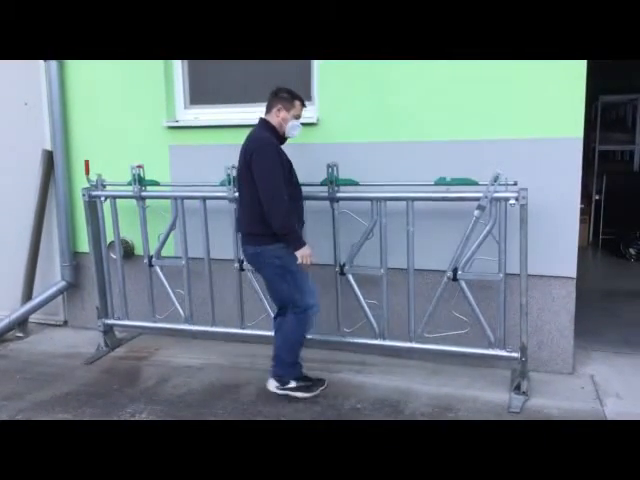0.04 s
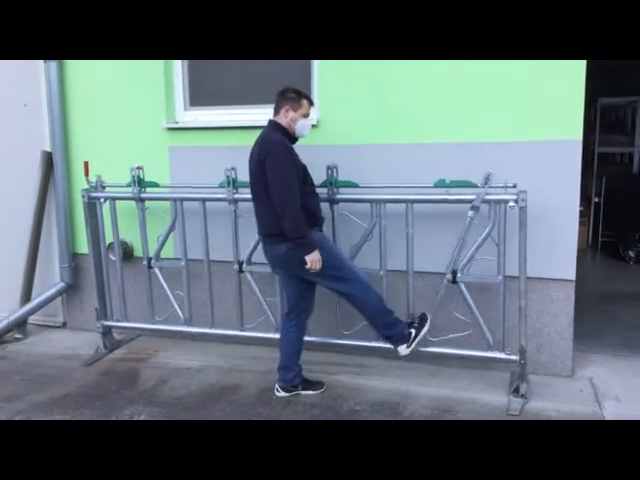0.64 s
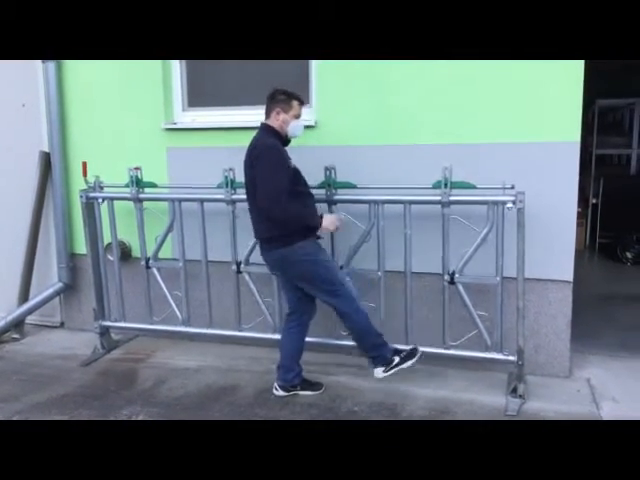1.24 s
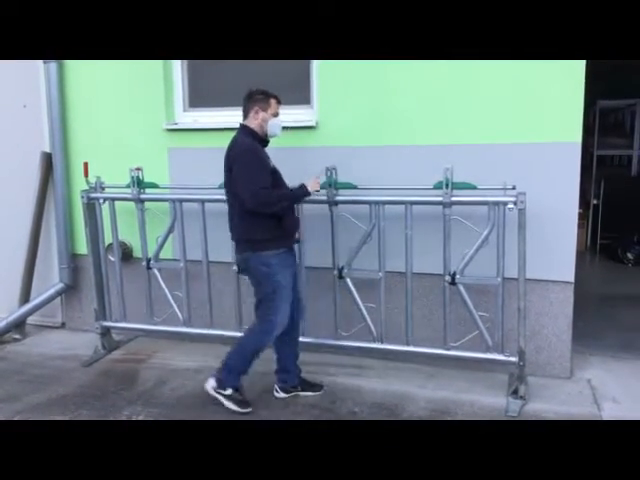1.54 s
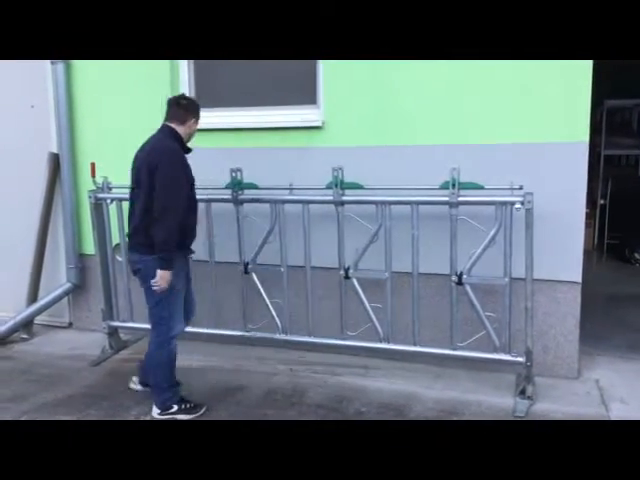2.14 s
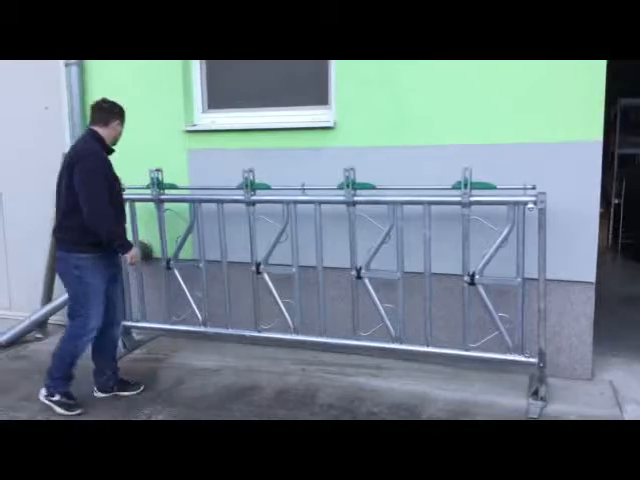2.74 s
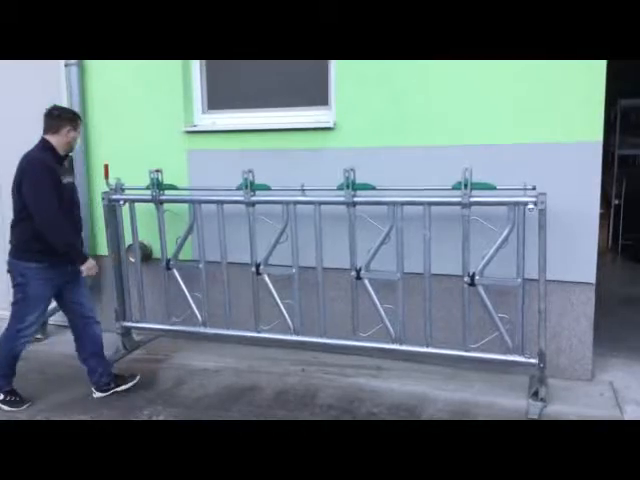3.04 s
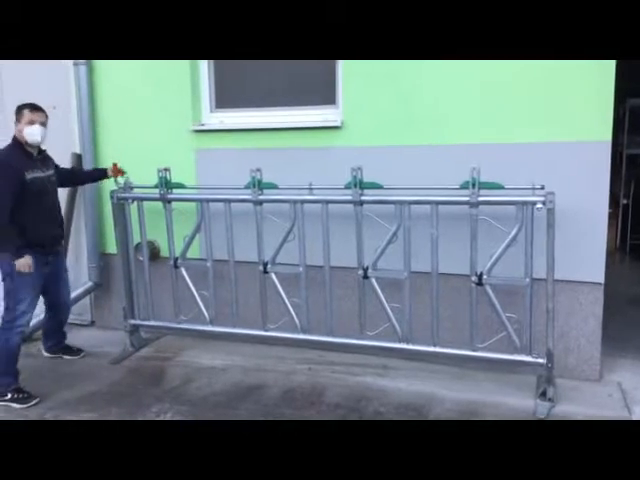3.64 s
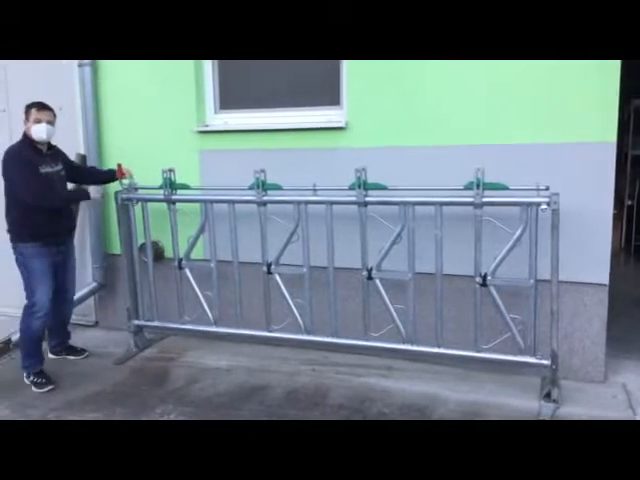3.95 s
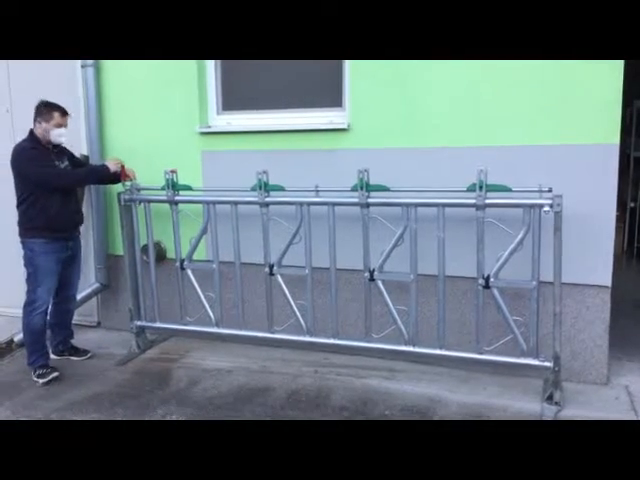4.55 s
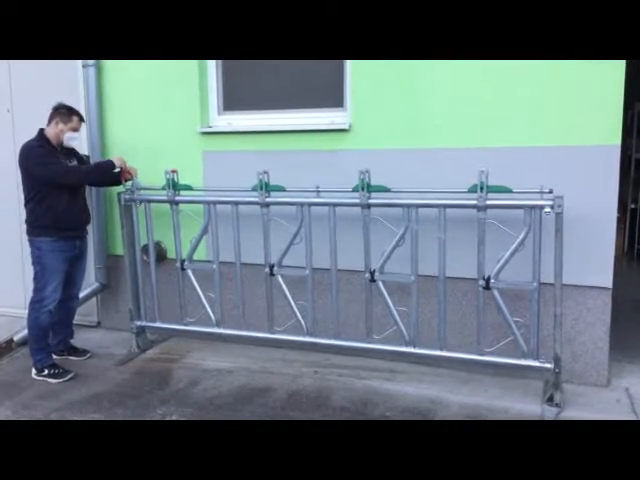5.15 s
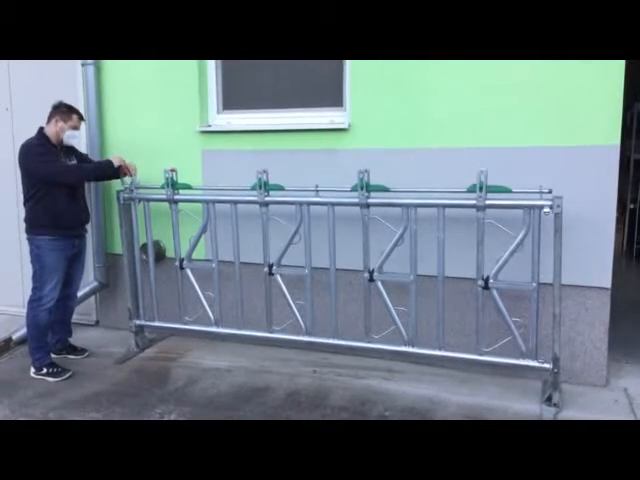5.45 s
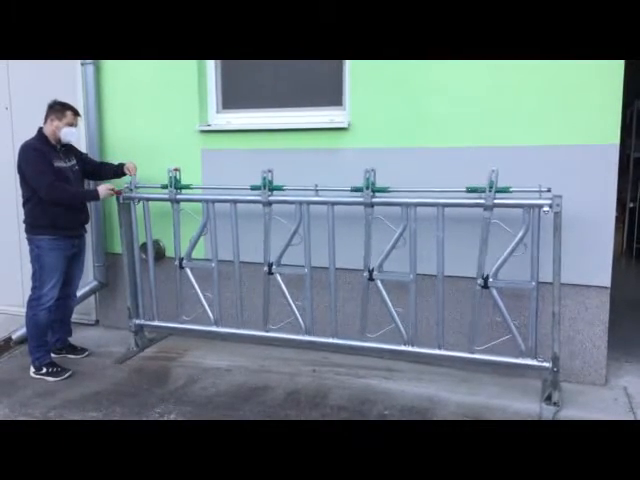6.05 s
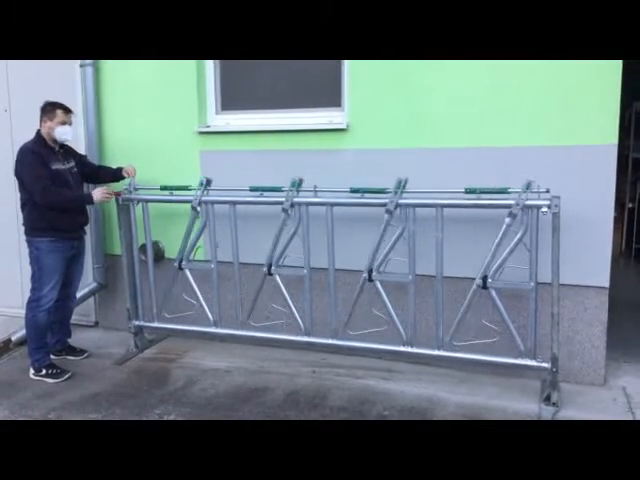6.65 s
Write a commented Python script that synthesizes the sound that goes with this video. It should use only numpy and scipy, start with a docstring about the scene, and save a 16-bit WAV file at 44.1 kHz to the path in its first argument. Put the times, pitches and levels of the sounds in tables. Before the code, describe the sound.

Distant road noise and a low engine drone run throughout in an outdoor concrete yard, the road noise slowly easing. A soft gritty footstep comes at the very start. Around 0.8 seconds a steel barrier rattles, then a bar clanks loudly into its catch at 1 second, with a smaller rebound at 1.3 and a short ring from the tubes. Four quiet steps crunch on sandy concrete between 1.8 and 3.9 seconds, and a thin far whine swells briefly near 2. At about 4 seconds a sole squeaks and scuffs, followed by light shuffles. A lever snaps over with a sharp, ringing clank at 5 seconds. From 5.9 the frame rattles and knocks, and near 6.5 several bars fall in a loud clatter, bouncing and dying away. The walls add a short echo. Very faint bird chirps dot the middle, and a far exhaust hum rises slightly toward the end.

```python
"""A gritty footstep over a distant road hush, then a foot pushes one swinging bar of a galvanized feed
barrier until it clanks into its catch. Steps crunch to the end, a sole squeaks, a lever snaps over, and
the locking rod turns and lets all the bars fall open in a clatter. Each blow cracks, shakes the frame's
short modes and leaves the tubes ringing. The concrete yard's walls answer; far off, small birds call,
engines drone and the road noise recedes."""
import sys
import numpy as np
from scipy import signal
from scipy.fft import rfft, irfft, next_fast_len
from scipy.io import wavfile
from scipy.ndimage import map_coordinates

SR = 44100
rng = np.random.default_rng(int(sys.argv[2]) if len(sys.argv) > 2 else 0)


def wav_record(signal):
    """Record a signal, one row per channel, as 16-bit PCM in the file named by sys.argv[1]."""
    frames = np.transpose(np.atleast_2d(signal))
    bounded = np.clip(frames, -1, 1)
    # unit amplitude maps onto the largest positive 16-bit level
    quanta = np.round(bounded * 32767).astype(np.int16)
    wavfile.write(sys.argv[1], SR, quanta)


N = 299880
TOP_HZ = 10480  # top of the frame's modes and of the mix

# single hard knocks (the faint one at 4.104 s adds bite to a shoe's stamp):
# t/s, level/dB, tilt/(dB/octave), chatter/s, tube ring/dB, place (0 = far bar, 1 = lever end)
KNOCKS = [(.852, -31, -4, 0.0044, -1.5, .85), (1.044, -18.5, 0, .006, -1, 0),
          (1.268, -31, -2.5, 0.015, -3, 0), (1.286, -31, -7, 0.013, -8, 0.15),
          (4.104, -44.5, -3.5, 0.0042, -13.5, 0.91), (5.049, -20, .5, 0.0043, -2.5, .82),
          (5.675, -46.5, -10.5, 0.023, -19, .8), (6.097, -25.5, -4.5, .009, 0, 0.54),
          (6.438, -38.5, 8, .006, -8, .6)]
def barrier(ring_trim_db=-3):
    """The main hits: every knock, rattle and bounce clanks the frame and rings the tubes."""
    out = np.zeros(N)
    mode_sets = [frame_modes() for _ in range(4)]  # each hit picks one at random, varying its colour
    for s, db, tilt, chatter_s, ring_db, place in KNOCKS + rattles() + bounces():
        modes = mode_sets[rng.integers(len(mode_sets))]
        add(out, s, amp(db) * frame_clank(modes, tilt, chatter_s))
        add(out, s, amp(db + ring_db + ring_trim_db) * tube_ring(place, tilt, chatter_s))
    return out


# a foot or the rod pushes the frame: t/s, length/s, first level/dB, last level/dB, tilt/(dB/octave)
RATTLES = [(.792, .15, -35, -41, -1.5), (5.942, .15, -41.5, -31.5, -4), (6.282, .135, -36, -30.5, -1.5)]
def rattles(count=4, scatter=0.25, dulling=2.2, chatter_s=0.028, ring_db=3.5, place=0.53):
    """Each push jogs loose parts at uneven gaps, duller after the first contact; rows as in KNOCKS."""
    progress, rows = np.linspace(0, 1, count), []
    for s, length, first_db, last_db, tilt in RATTLES:
        jitter = (progress > 0) * scatter * rng.uniform(-1, 1, count)
        times = s + length * (np.arange(count) + jitter) / count
        for at, u in zip(times, progress):
            db = first_db + u * (last_db - first_db)
            rows.append((at, db, tilt - dulling * (u > 0), chatter_s, ring_db, place))
    return rows


# four bars hit their stops: t/s, level/dB, tilt/(dB/octave), place, first flight/s, first loss/dB
FALLS = [(6.452, -17, -0.5, 0.6, 0.097, 3), (6.469, -18.5, -2.5, 0.5, 0.1, -0.5),
         (6.482, -23.5, 5.5, 0.5, .103, -1.5), (6.498, -19.5, 1, .5, 0.13, 6)]
def bounces(count=4, flight_ratio=0.96, later_loss_db=7):
    """Each falling bar rebounds ever sooner and looser as it dies away; rows as in KNOCKS."""
    rows = []
    for s, first_db, tilt, place, flight_s, first_loss_db in FALLS:
        for k in range(count):
            at = s + flight_s * np.sum(flight_ratio ** np.arange(k))
            db = first_db - first_loss_db * (k > 0) - later_loss_db * max(k - 1, 0)
            chatter_s, ring_db = 0.008 + 0.003 * k, -8 + 3 * k
            rows.append((at, db, tilt, chatter_s, ring_db, place))
    return rows


# tone colour of the steel frame: f/Hz, relative level/dB
FRAME_COLOUR = [(200, -9), (260, -16), (330, -20), (480, -24), (640, -17), (820, -12), (1500, -4.5),
                (2400, 0), (3100, -4.5), (3600, -7), (4500, -11), (6500, -18.5), (9000, -23.5),
                (10500, -30)]
# decay of its modes: f/Hz, t60/s
FRAME_DECAY = [(300, 0.18), (1500, 0.16), (3000, 0.13), (6000, 0.12), (10000, 0.11)]
def frame_modes(count=520):
    """The frame's crowd of short modes: frequencies, strengths and one decaying wave each."""
    position = (np.arange(count) + rng.random(count)) / count
    hz = 200 * (TOP_HZ / 200) ** (position ** (2 / 3))
    # the upper modes differ widely in strength and life; the low ones blur into a thud
    uneven = np.clip(hz / 2500, 0, 1)
    t60 = along(FRAME_DECAY, hz) * np.exp(0.3 * uneven * rng.standard_normal(count))
    strength_db = along(FRAME_COLOUR, hz) + uneven * rng.uniform(-9, 5, count)
    t = np.arange(SR * 2 // 5, dtype=np.float32) / SR
    phases = rng.uniform(0, 2 * np.pi, count)
    omega, damping, phase = np.float32([2 * np.pi * hz, np.log(1000) / t60, phases])[:, :, None]
    waves = np.sin(omega * t + phase) * np.exp(-damping * t)
    return hz, amp(strength_db) * np.sqrt(np.gradient(hz)), waves


def frame_clank(modes, tilt, chatter_s, crack_db=-3, crack_t60=0.014, attack_s=0.0011):
    """Body and bite of a hit: every rebound tops up the dying modes and adds a noisy crack."""
    hz, strength, waves = modes
    n = waves.shape[1]
    t = np.arange(n) / SR
    blows = np.pad(chatter(chatter_s), (0, n))[:n]
    colour = strength * amp(tilt * octaves(hz, 2300))
    body = np.float32(colour / np.linalg.norm(colour) * rng.choice([-1, 1], len(hz))) @ waves
    decay_makeup = amp(60 * np.minimum(t, 3 * chatter_s) / along(FRAME_DECAY, 2300))
    top_up = np.sqrt(np.cumsum((blows * decay_makeup) ** 2))
    crack_energy = abs(signal.fftconvolve(blows ** 2, amp(-60 * t / crack_t60) ** 2)[:n])
    hiss = filtered(rng.standard_normal(n),
                    lambda f: amp(along(FRAME_COLOUR, f) + tilt * octaves(f, 2300)))
    cracks = amp(crack_db) * unit(hiss) * np.sqrt(crack_energy)
    return (np.sqrt(2) * body * top_up + cracks) * (1 - np.exp(-t / attack_s))


def chatter(length, count=16, firm_s=0.015):
    """A first contact and the weakening rebounds of loose parts, energy 1; long chatter starts softly."""
    length = length + 1e-4
    when = np.append(0, np.sort(rng.uniform(0, 3, count)))  # in multiples of the length
    rebounds = rng.choice([-1, 1], count) * rng.uniform(0.25, 0.84, count)
    size = np.append(min(firm_s / length, 1.2), rebounds) * np.exp(-0.6 * when)
    return np.bincount((when * length * SR).astype(int), size / np.linalg.norm(size))


# the tubes' clear modes: f/Hz, t60/s, level/dB struck at the far bar, level/dB struck at the lever end
TUBE_MODES = [(841, 0.2, -16, -16.5), (933, 0.12, -16.5, -27), (1208, 0.68, -21.5, -23),
              (1280, .4, -16.5, -18), (1517, 0.55, -11, -17.5), (1522, 0.73, -19.5, -7.5),
              (1550, 0.5, -19, -7.5), (1583, 0.53, -15, -17), (1667, 0.45, -12.5, -17),
              (1880, 0.54, -25, -25.5), (1980, 0.24, -23.5, -17), (1990, 0.37, -19.5, -27.5),
              (2267, .55, -21.5, -19), (2420, .2, -12, -20), (2670, .25, -19.5, -24.5),
              (2794, 0.77, -32, -21.5), (2860, 0.31, -4.5, -22), (2995, 0.8, -15, -35),
              (3060, 0.19, -5.5, -21), (3340, .35, -27.5, -16.5), (3427, 1.1, -39.5, -23),
              (3580, 1.36, -20.5, -51.5), (3727, 0.8, -21.5, -34), (4107, 0.8, -43.5, -28.5),
              (4320, 0.68, -35, -25.5), (6130, .08, -9, -32), (6395, .33, -42.5, -34),
              (6860, .14, -19.5, -36.5), (9060, 0.18, -29.5, -23), (10140, .2, -33, -24)]
def tube_ring(place, tilt, chatter_s, mistune_per_s=0.334):
    """The pitched tail of a hit: the place of the blow decides which tubes speak."""
    t = np.arange(SR) / SR
    hz, t60, bar_db, lever_db = np.transpose(TUBE_MODES)
    mode_db = bar_db + place * (lever_db - bar_db) + tilt * octaves(hz, 2300)
    gains = np.float32(amp(mode_db + rng.standard_normal(len(hz))))
    # long chatter spreads to neighbouring bars of slightly different pitch
    detune = mistune_per_s * max(chatter_s - 0.012, 0)
    pitch = hz * (1 + detune * rng.standard_normal(len(hz)))
    cycles = np.float32(pitch[:, None] * t + rng.random((len(hz), 1)))
    decay = np.float32(amp(-60 * t / t60[:, None]))
    attack = 1 - np.exp(-t / (0.0016 + chatter_s / 2))
    return gains @ (decay * np.sin(2 * np.pi * cycles)) * attack


# modes of the lever and its stop: f/Hz, t60/s, relative level/dB
LEVER_MODES = [(832.3, 0.31, -21), (1860, 0.12, -1), (2107, .15, -9.5), (2420, .085, -1.5),
               (2510, 0.085, -10.5), (2840, .13, -9.5), (3060, 0.063, -2), (3360, .14, -12.5),
               (3840, 0.1, -14), (4300, .15, -17), (4650, .13, -20), (5330, 0.092, -20.5),
               (6850, .14, -24.5), (8760, .16, -26.5), (8930, .14, -25), (9800, .18, -33.5)]
# modes of the swinging bar's small catch: f/Hz, t60/s, relative level/dB
CATCH_MODES = [(5280, .04, 0), (5450, .05, 5), (5760, .04, 0), (7350, 0.027, -11), (9530, 0.029, -13)]
# jogs of the catch: t/s, level/dB
TINKS = [(0.688, -58.5), (.712, -64), (.798, -49)]
def catch_and_lever(snap_s=5.0495, snap_db=-16):
    """The catch tinks as the foot lifts the bar; later the lever snaps against its stop."""
    out = np.zeros(N)
    for s, db in TINKS:
        add(out, s, amp(db) * ping(CATCH_MODES, attack_s=0.001))
    add(out, snap_s, amp(snap_db) * ping(LEVER_MODES, attack_s=0.003))
    return out


def ping(modes, attack_s):
    """One blow sets a small solid part's modes ringing."""
    t = np.arange(SR // 2) / SR
    ring = sum(amp(db + rng.normal(0, 1) - 60 * t / t60) * np.sin(2 * np.pi * (hz * t + rng.random()))
               for hz, t60, db in modes)
    return ring * (1 - np.exp(-t / attack_s))


# steps on sandy concrete: t/s, heel level/dB, heel tilt/(dB/octave), sole level/dB, roll/s
STEPS = [(0.017, -48.5, -9, -70, 0.075), (1.806, -50.5, -1, -63, 0.084), (2.385, -45.5, 4.5, -47.5, 0.036),
         (3.050, -43.5, -5.5, -61, 0.032), (3.905, -43.5, -4.5, -50.5, 0.027)]
def footfalls():
    """The three contacts of every step; rows as in SLIDES."""
    rows = []
    for s, heel_db, tilt, sole_db, roll_s in STEPS:
        heel = (s, 0.006, heel_db, tilt)
        sole = (s + 0.01, roll_s, sole_db, -0.81)
        toe = (s + 0.207, 0.0074, -63.5, 7.1)  # the other foot pushes off and flicks a few grains
        rows += [heel, sole, toe]
    return rows


def heel_thuds(level_db=-51, t60=0.18, attack_s=0.002):
    """The walker's weight lands on each heel in a dull burst of noise."""
    weight, t = np.zeros(N), np.arange(SR // 4) / SR
    for s, *_ in STEPS:
        add(weight, s, amp(level_db - 60 * t / t60) * (1 - np.exp(-t / attack_s)))
    return weight * noise([(100, -2), (350, -3), (800, -5), (1600, -23), (4000, -60)])


# a sole slides or stamps: t/s, length/s, level/dB, tilt/(dB/octave)
SLIDES = [(4.068, 0.031, -36.5, 0), (4.104, .014, -33.5, -3), (4.364, 0.073, -57, -9.5),
          (4.634, .075, -60.5, 2.5), (4.715, 0.14, -54, -2)]
# tone colour of crushed sand: f/Hz, relative level/dB
GRIT_COLOUR = [(200, 10.5), (600, -3.5), (1500, 4.5), (2400, 0.5), (4500, -2), (7000, -1.5), (10500, -6.5)]
def grit(grains_per_s=2000, spread_db=5, clumps_per_s=110, attack_s=0.00089, release_s=0.007):
    """Sand grains of very uneven size crack in clumps under the sole."""
    n = SR // 4
    out, t = np.zeros(N), np.arange(n) / SR
    for s, length, db, tilt in footfalls() + SLIDES:
        clicks = (rng.random(n) < grains_per_s / SR) * rng.choice([-1, 1], n)
        grains = clicks * amp(spread_db * rng.standard_exponential(n).clip(0, 3))
        crunch = filtered(grains + 0.072 * rng.standard_normal(n),
                          lambda f: amp(along(GRIT_COLOUR, f) + tilt * octaves(f, 4000, floor_hz=1800)))
        clumps = amp(map_coordinates(rng.standard_normal(n), [t * clumps_per_s], order=1))
        envelope = np.minimum(t / attack_s, 1) * np.exp(-np.maximum(t - length, 0) / release_s)
        crunch *= clumps * envelope
        add(out, s, amp(db) * crunch * np.sqrt(length * SR / np.sum(crunch ** 2)))
    return out


# resonances of a twisting rubber sole: f/Hz, width/Hz, relative level/dB
SQUEAK_BANDS = [(2840, 860, 9.5), (5280, 800, 2), (6300, 750, -5), (9300, 900, -11)]
def squeak(start_s=4.018, length_s=0.041, level_db=-47, attack_s=0.0048, release_s=0.012):
    """A sole sticks and slips in a short hoarse squeak as the foot turns."""
    t = np.arange(N) / SR - start_s
    rasp = filtered(rng.standard_normal(N), lambda f: sum(
        amp(db) / (1 + (2 * (f - hz) / width) ** 2) for hz, width, db in SQUEAK_BANDS))
    envelope = np.clip(t / attack_s, 0, 1) * np.clip((length_s - t) / release_s + 1, 0, 1)
    return amp(level_db) * unit(rasp) * envelope


# reverb time of the concrete yard: f/Hz, t60/s
YARD_DECAY = [(200, 0.91), (1500, 0.38), (3500, 0.45), (6000, 0.28), (10000, 0.28)]
def yard(x, predelay_s=0.0055, build_s=0.0062, block=24000):
    """The walls' answer swells briefly and dies sooner in the treble; each moment takes other paths."""
    out = np.zeros(N)
    for i in range(0, N, block // 2):
        hz, t, bands = signal.stft(rng.standard_normal(SR * 3 // 5), SR, nperseg=256)
        tail = signal.istft(bands * amp(-60 * t / along(YARD_DECAY, hz)[:, None]), SR, nperseg=256)[1]
        tail *= np.clip((np.arange(len(tail)) / SR - predelay_s) / build_s, 0, 1)
        piece = x[i:i + block]
        piece = piece * np.sin(np.pi * np.arange(len(piece)) / block)
        add(out, i / SR, signal.fftconvolve(piece, tail / np.linalg.norm(tail)))
    return out


# far chirps: t/s, starting f/Hz, level/dB
CHIRPS = [(1.70, 3480, -79), (1.82, 3900, -71), (2.669, 3410, -74), (2.74, 3020, -71), (3.57, 4610, -73),
          (3.60, 4000, -70), (3.745, 3600, -72.5), (4.355, 2865, -61.5), (4.895, 2910, -60.5)]
def birds(note_s=0.062, pitch_fall=0.06, warble_hz=60):
    """Far birds slide down through short warbled notes."""
    out, warble = np.zeros(N), warble_hz * wobble(250)
    progress = np.linspace(0, 1, round(note_s * SR))
    for s, start_hz, db in CHIRPS:
        hz = start_hz * (1 - pitch_fall * progress) + warble[round(s * SR):][:len(progress)]
        add(out, s, amp(db) * np.sin(np.pi * progress) * np.sin(phase_of(hz)))
    return out


# harmonics of the idle: multiple of the firing rate, relative level/dB
IDLE_ORDERS = [(4, -0.5), (5, -3), (6, -3), (8.5, -11), (10.5, -12), (14.5, -20)]
def idling_engine(firing_hz=25.03, level_db=-46, blur_rad=0.41):
    """A steady drone: all orders follow one crankshaft; changing paths blur each a little."""
    firing = phase_of(firing_hz + 0.1469 * wobble(2))
    drone = np.zeros(N)
    for order, db in IDLE_ORDERS:
        gain = amp(db + 2.4 * wobble(5))
        drone += gain * np.sin(order * firing + blur_rad * (wobble(9) + wobble(0.94)))
    return amp(level_db) * unit(drone)


# the vehicle's exhaust note: t/s, f/Hz, level/dB
EXHAUST = [(1.5, 56.1, -72), (1.8, 56.4, -50), (3.4, 59.8, -51.5), (4.4, 58, -54), (4.9, 63.5, -48.5),
           (5.65, 66.7, -42), (6.3, 65.1, -50)]
def vehicle():
    """A low exhaust hum comes in and rises as a far vehicle speeds up a little."""
    t = np.arange(N) / SR
    s, hz, db = np.transpose(EXHAUST)
    return amp(np.interp(t, s, db)) * far_tone(np.interp(t, s, hz), drift_hz=1.5, flutter_db=1)


def whine(hz=1039, peak_s=2.07, width_s=0.25, level_db=-57.5):
    """A thin far tone swells and fades once."""
    swell = np.exp(-((np.arange(N) / SR - peak_s) / width_s) ** 2)
    return amp(level_db) * swell * far_tone(hz, drift_hz=7.3, flutter_db=4)


def far_tone(hz, drift_hz, flutter_db):
    """A sine of rms 1 that wavers on its way through the air."""
    return unit(np.sin(phase_of(hz + drift_hz * wobble(9))) * amp(-flutter_db * wobble(4.6)))


# low, middle and high layers of the road bed, each: f/Hz, relative level/dB
ROAD_RUMBLE = [(20, -32), (36, -13.5), (52, -5), (85, 0.5), (150, -1), (190, -6), (245, -6.5), (310, -21.5),
               (450, -28.5), (900, -67)]
ROAD_HUSH = [(150, -20), (280, -3.5), (420, -11), (560, -6), (780, -13), (1150, -9.5), (1650, -14),
             (2500, -26), (3200, -35), (5800, -45), (10500, -51.5)]
ROAD_HISS = [(500, -25.5), (1800, 7.5), (3200, 2), (5000, -10), (10000, -41)]
def road():
    """Road noise recedes: each layer sinks towards a resting level, the rumble settling first."""
    t = np.arange(N) / SR
    rumble = amp(-48.5 + 6.6 * np.exp(-t / 0.8)) * noise(ROAD_RUMBLE)
    hush = amp(-56.5 + 7.65 * np.exp(-t / 2) + 0.47 * wobble(4.7)) * noise(ROAD_HUSH)
    hiss = amp(-110 + 47.9 * np.exp(-t / 5.5)) * noise(ROAD_HISS)
    return rumble + hush + hiss


def amp(db):
    """Decibels to gain."""
    return 10 ** (np.asarray(db) / 20)


def unit(x):
    """Scale to rms 1."""
    return x / np.sqrt(np.mean(x ** 2) + 1e-20)


def along(points, hz):
    """Read (f/Hz, value) points on a log frequency axis."""
    f, value = np.transpose(points)
    return np.interp(np.log(hz + 1), np.log(f + 1), value)


def octaves(hz, centre_hz, floor_hz=600):
    """Octaves above a centre, flat below the floor."""
    return np.log2(np.maximum(hz, floor_hz) / centre_hz)


def phase_of(hz):
    """Running phase of a moving pitch, in radians."""
    return 2 * np.pi * np.cumsum(hz) / SR


def wobble(rate):
    """A smooth random curve, rate knots a second."""
    return map_coordinates(rng.standard_normal(int(N * rate / SR) + 4), [np.arange(N) * rate / SR])


def filtered(x, response):
    """Equalise x with a gain that depends on frequency."""
    size = next_fast_len(len(x) + 8192)
    return irfft(rfft(x, size) * response(np.fft.rfftfreq(size, 1 / SR)), size)[:len(x)]


def noise(spectrum):
    """Noise of rms 1, coloured by (f/Hz, level/dB) points."""
    return unit(filtered(rng.standard_normal(N), lambda hz: amp(along(spectrum, hz))))


def add(track, s, x):
    """Mix x into the track at time s."""
    i = max(round(s * SR), 0)
    track[i:i + len(x)] += x[:max(N - i, 0)]


def scene(steel_send_db=-7, near_send_db=-12, bird_send_db=-2):
    """Mono mix: barrier, feet and birds share the yard's reverb; the far bed stays dry."""
    steel = barrier()
    near = grit() + heel_thuds() + squeak() + catch_and_lever()
    calls = birds()
    reverb = yard(amp(steel_send_db) * steel + amp(near_send_db) * near + amp(bird_send_db) * calls)
    bed = idling_engine() + vehicle() + whine() + road()
    return (steel + near + calls + reverb + bed)[None]


def record(dry):
    """A steep low-pass cuts the treble above TOP_HZ."""
    return np.array([filtered(x, lambda hz: 1 / np.sqrt(1 + (hz / TOP_HZ) ** 160)) for x in dry])


dry = scene()
out = record(dry)
wav_record(out)
```